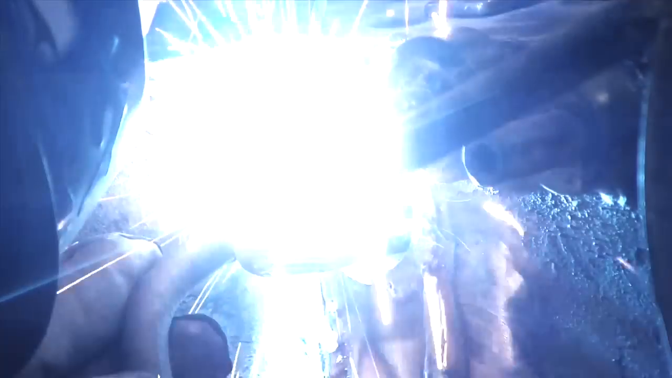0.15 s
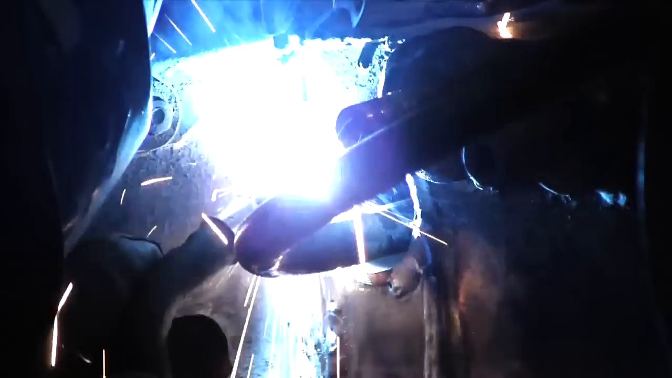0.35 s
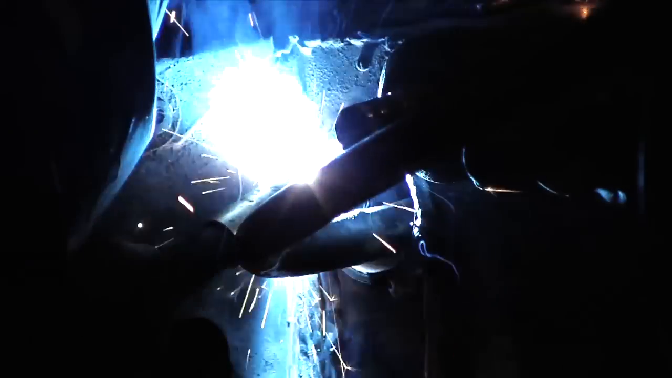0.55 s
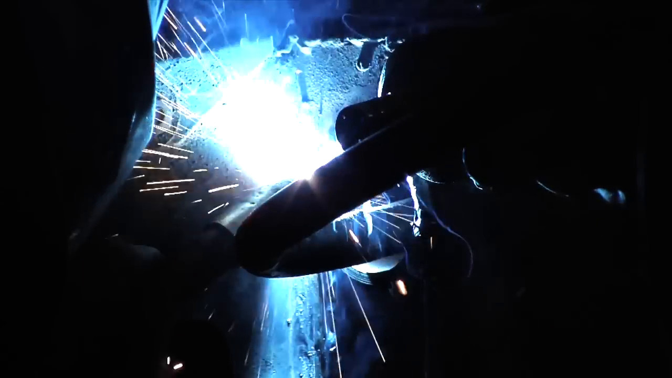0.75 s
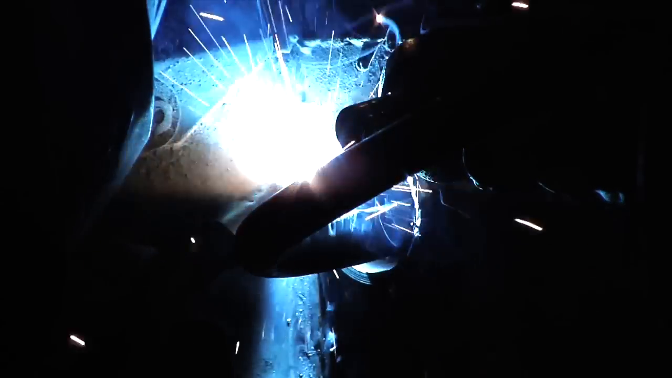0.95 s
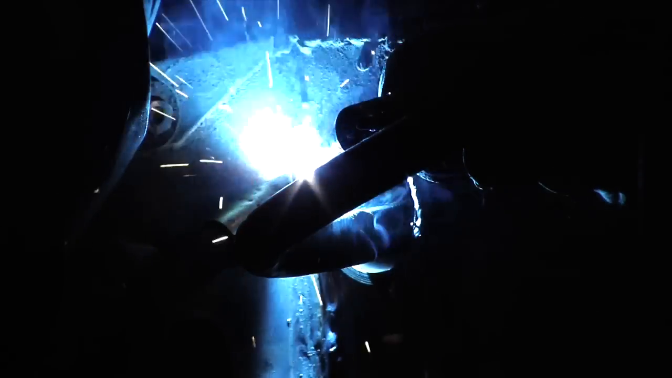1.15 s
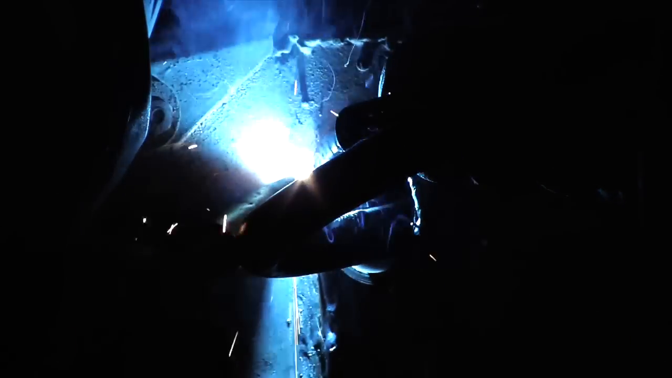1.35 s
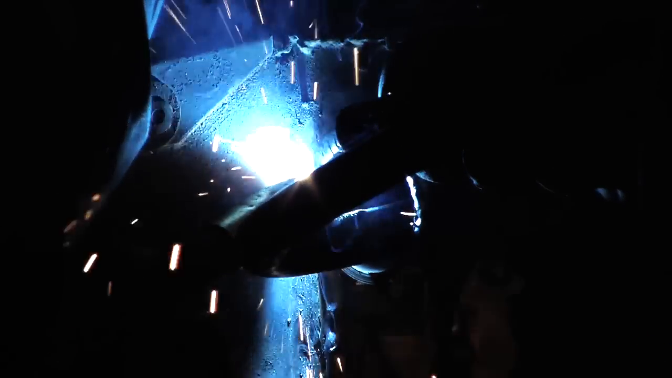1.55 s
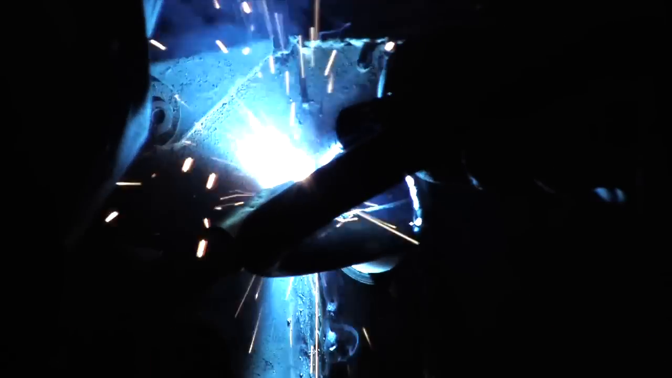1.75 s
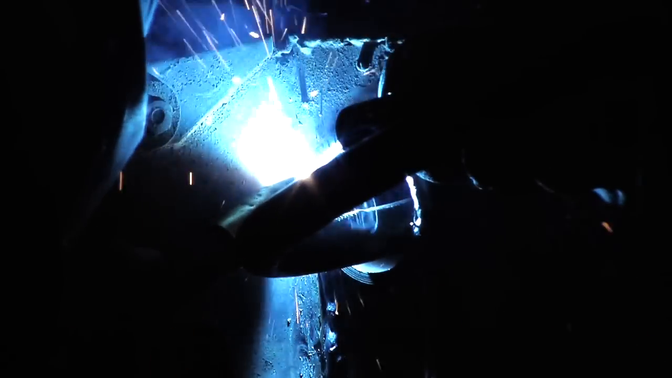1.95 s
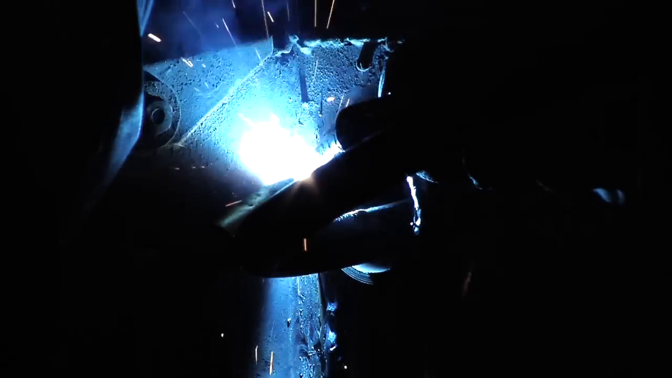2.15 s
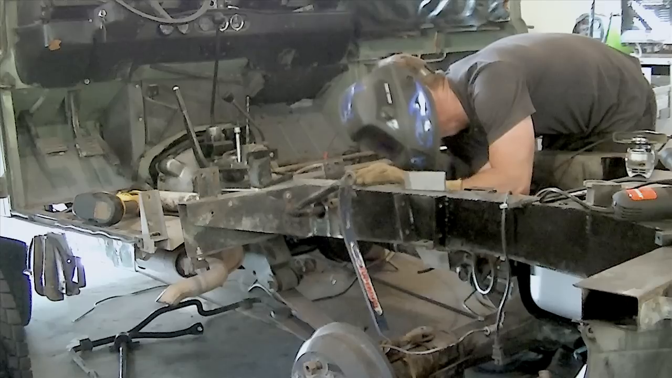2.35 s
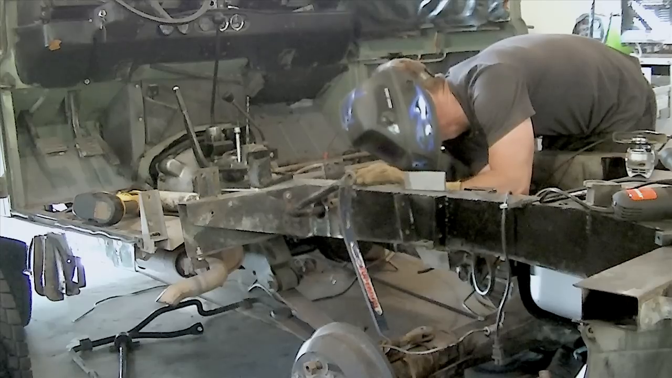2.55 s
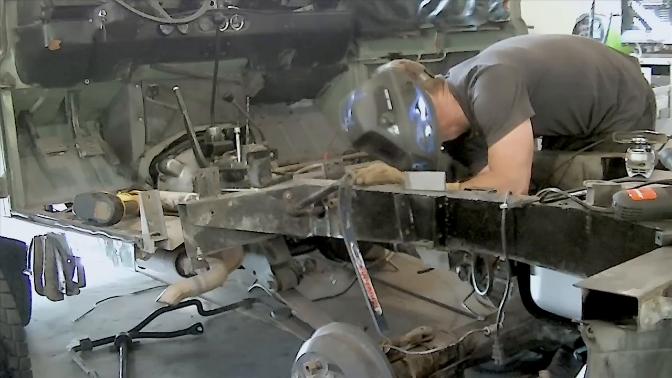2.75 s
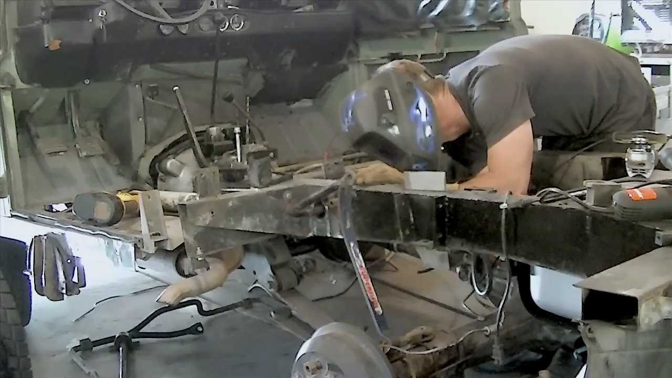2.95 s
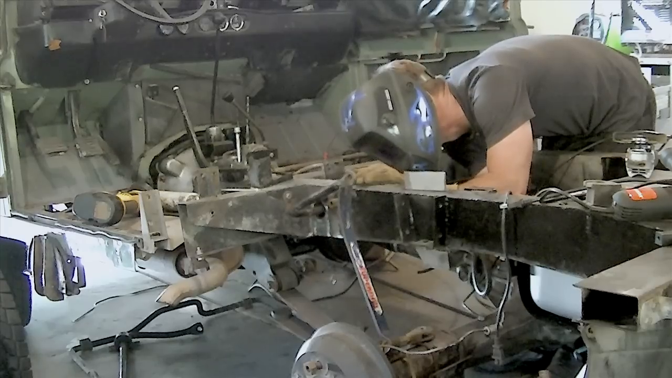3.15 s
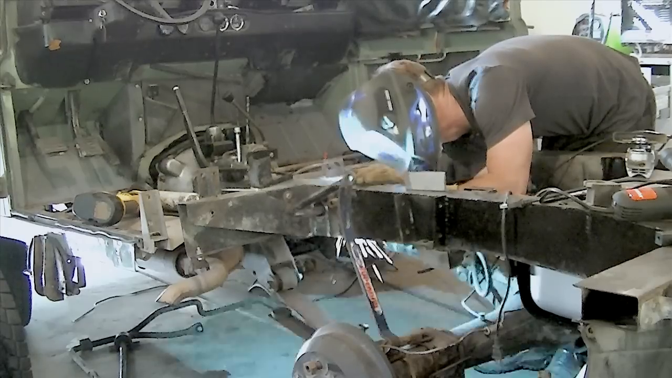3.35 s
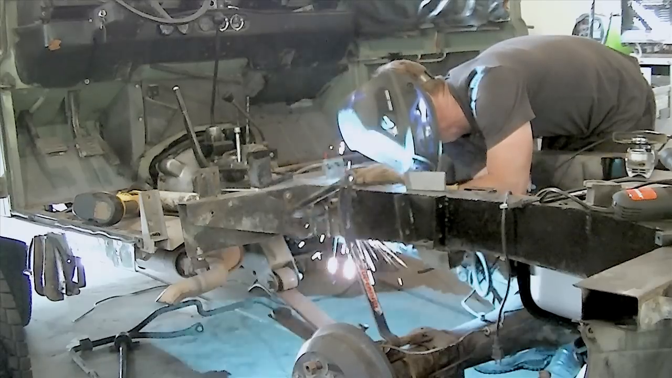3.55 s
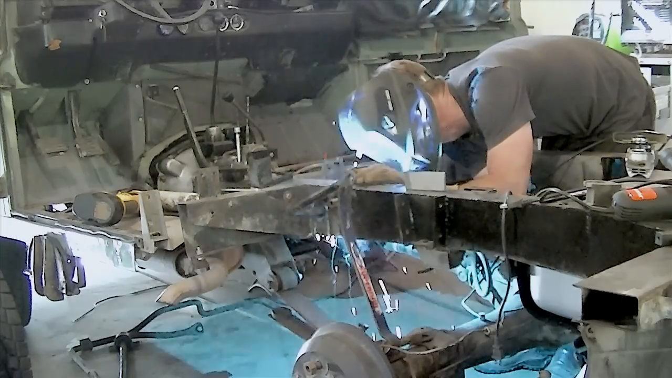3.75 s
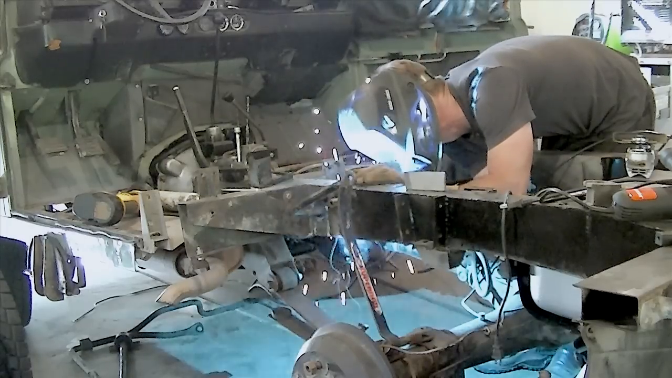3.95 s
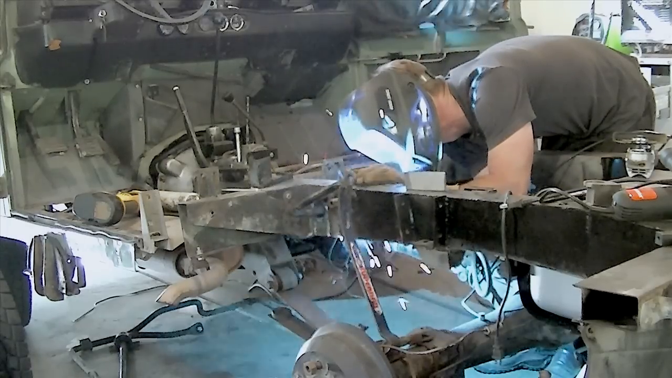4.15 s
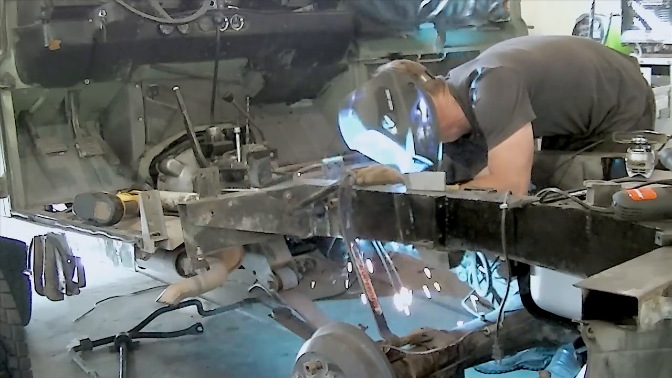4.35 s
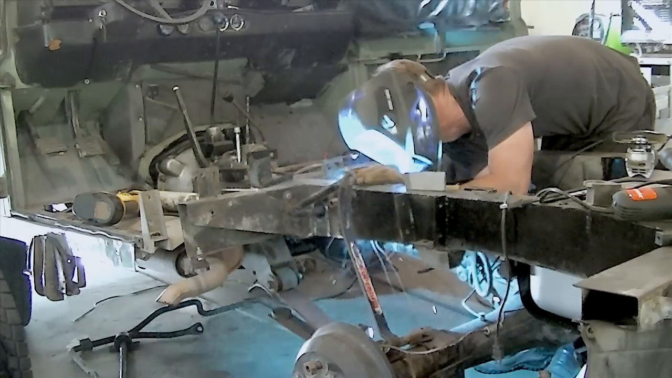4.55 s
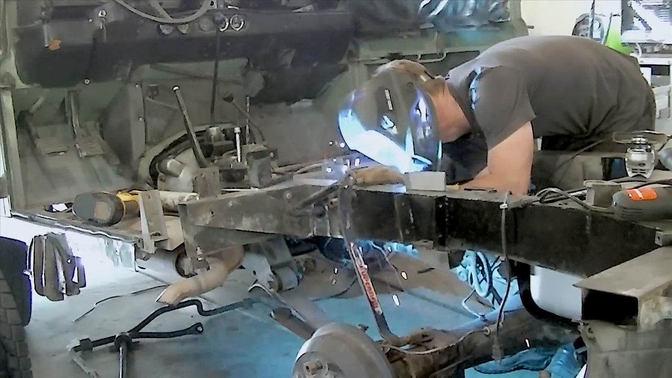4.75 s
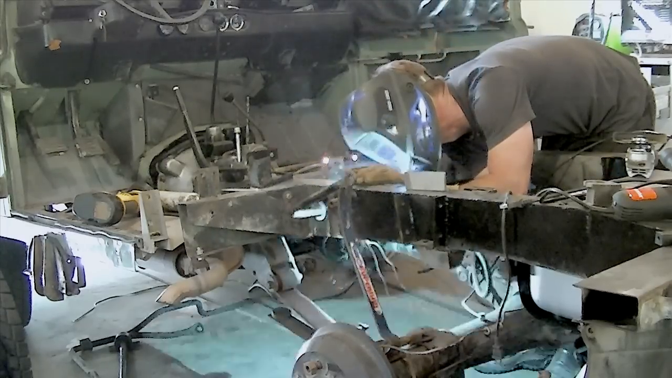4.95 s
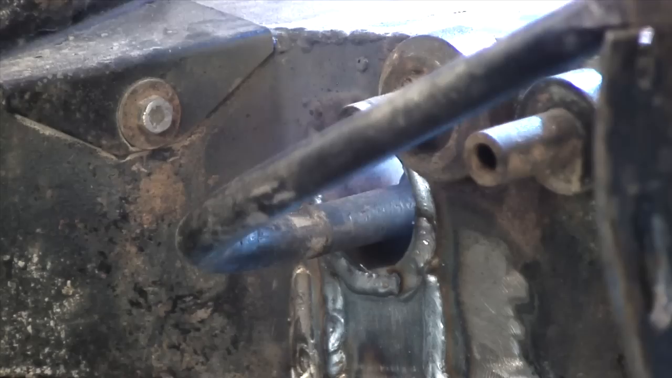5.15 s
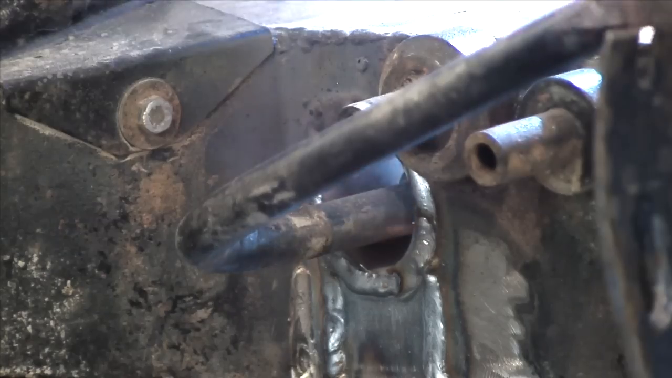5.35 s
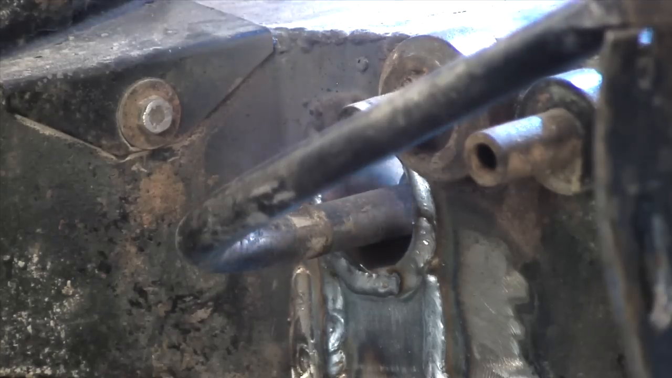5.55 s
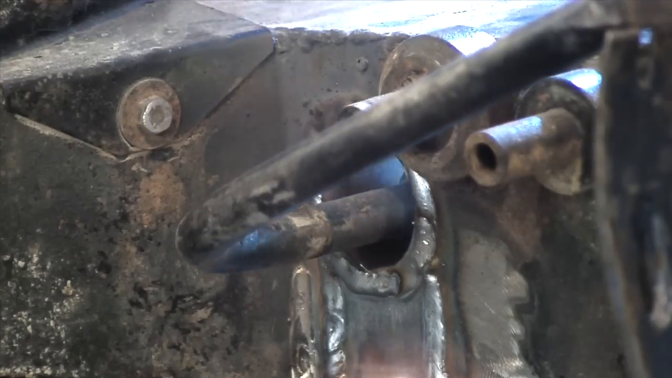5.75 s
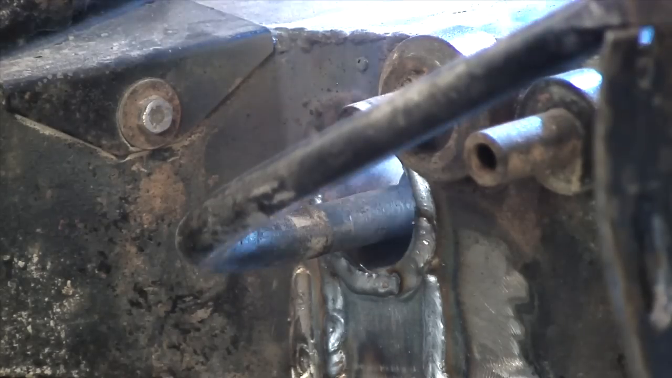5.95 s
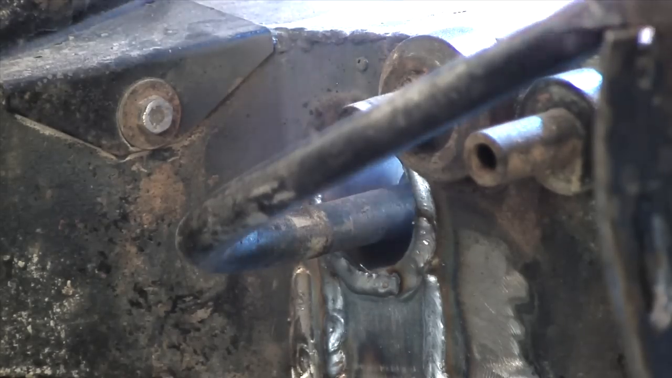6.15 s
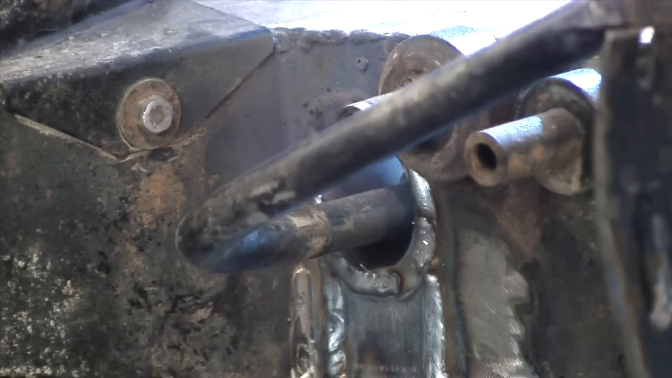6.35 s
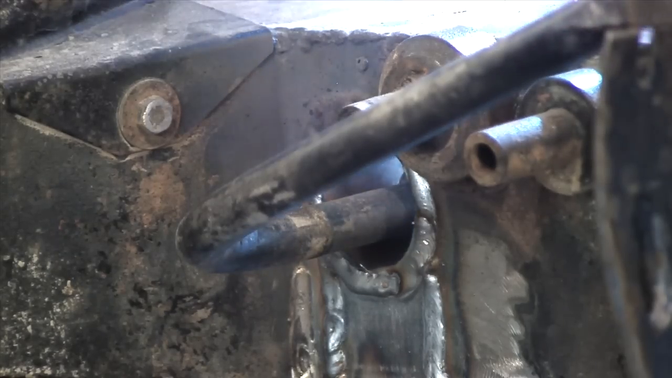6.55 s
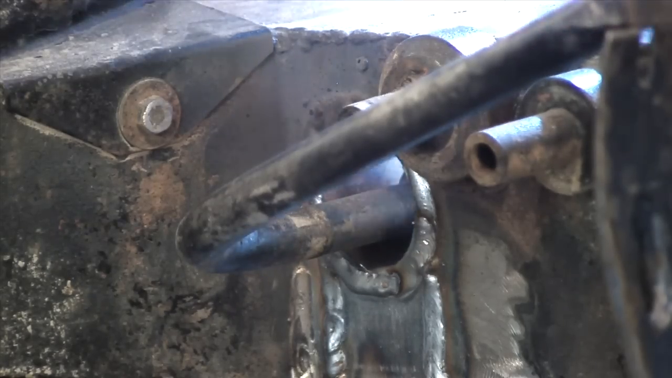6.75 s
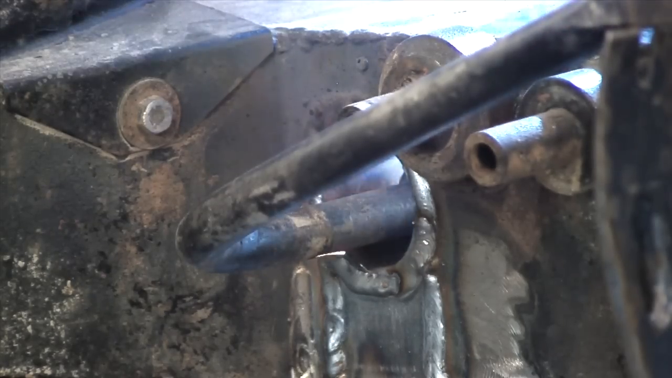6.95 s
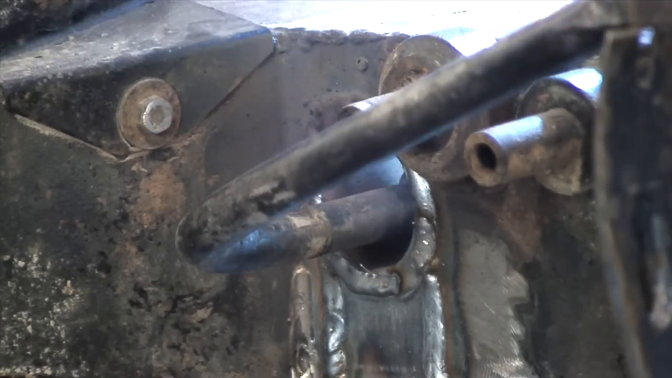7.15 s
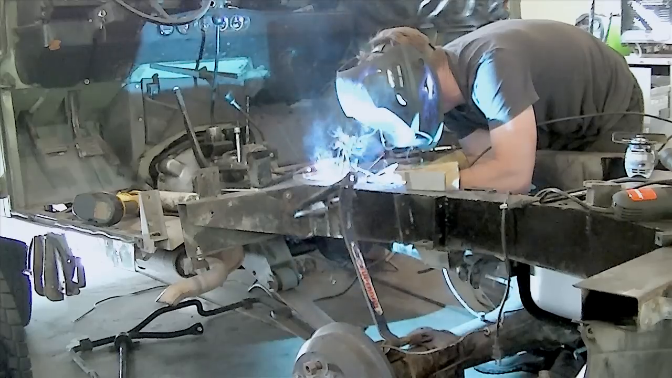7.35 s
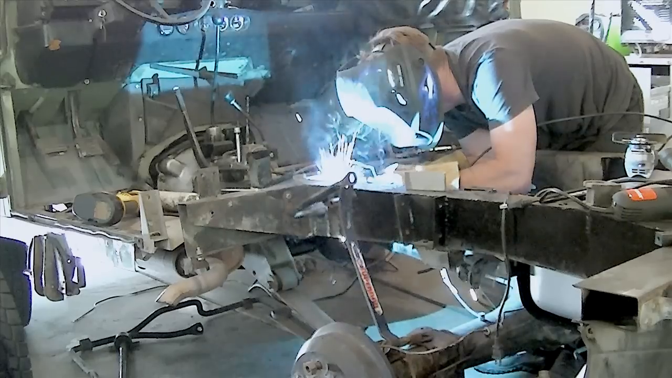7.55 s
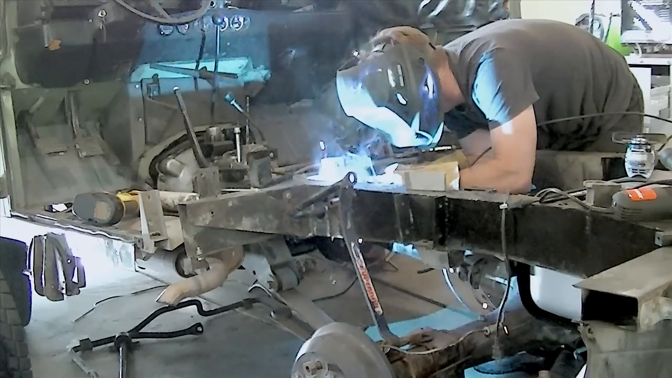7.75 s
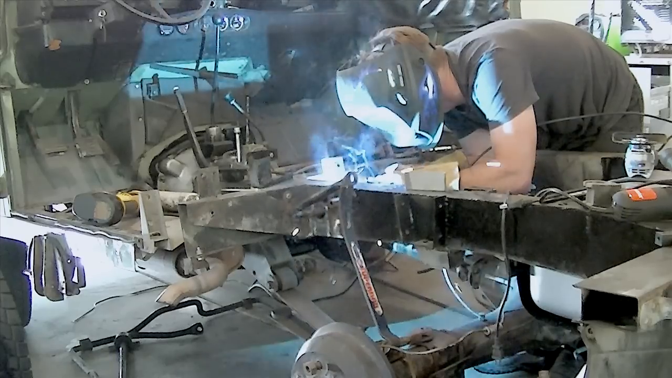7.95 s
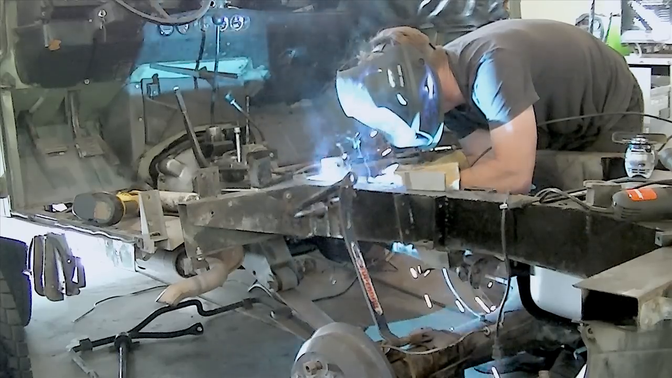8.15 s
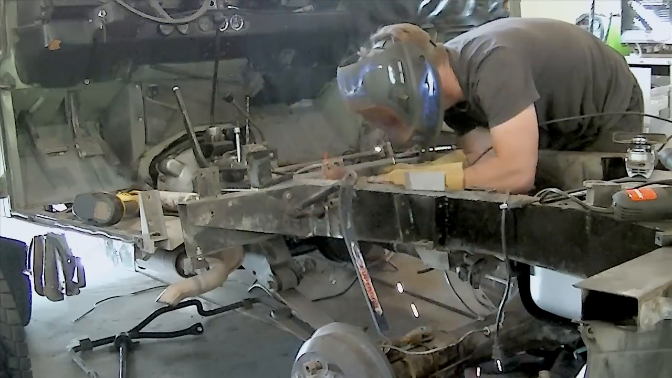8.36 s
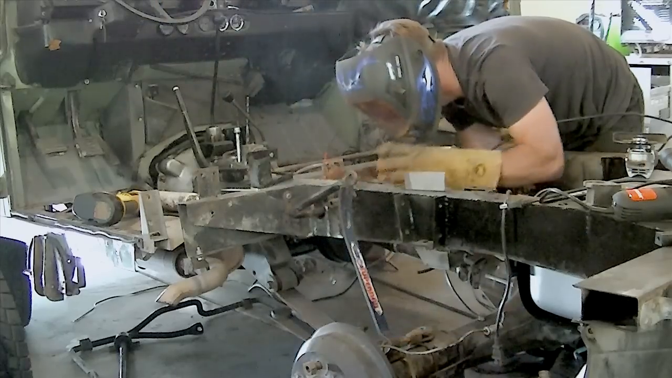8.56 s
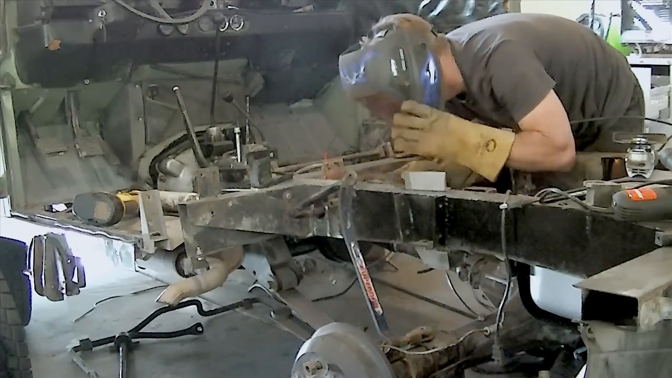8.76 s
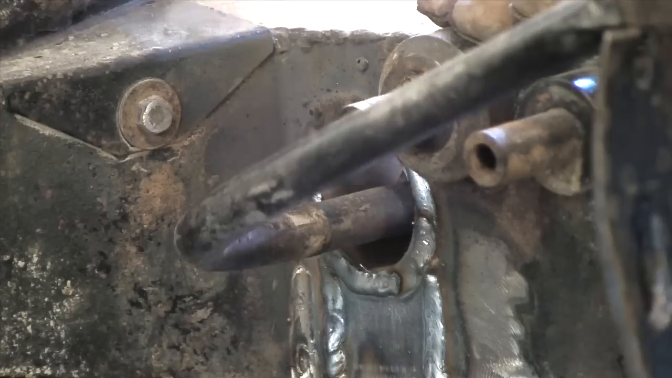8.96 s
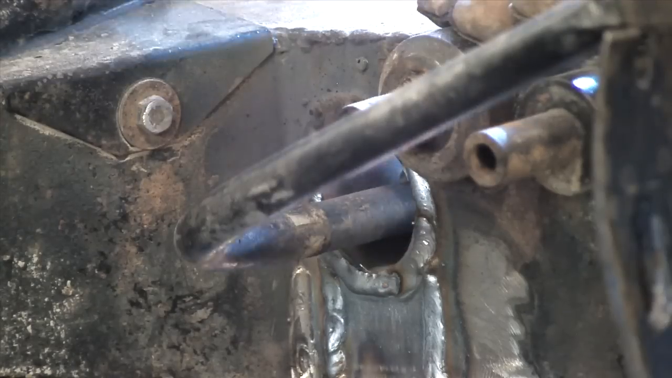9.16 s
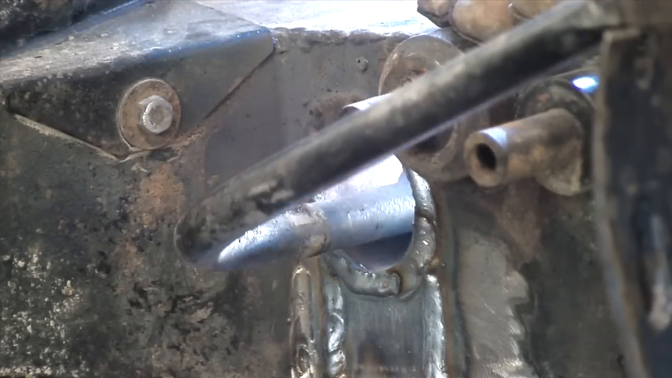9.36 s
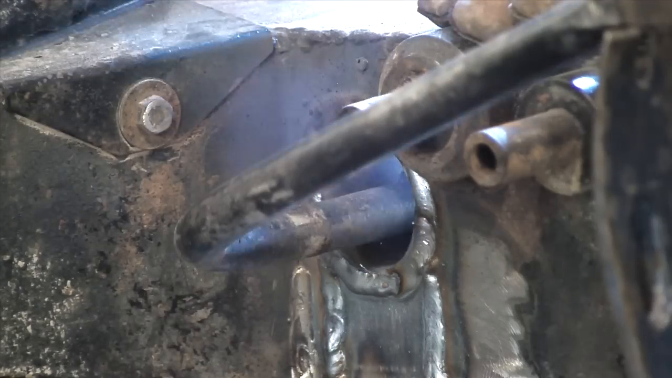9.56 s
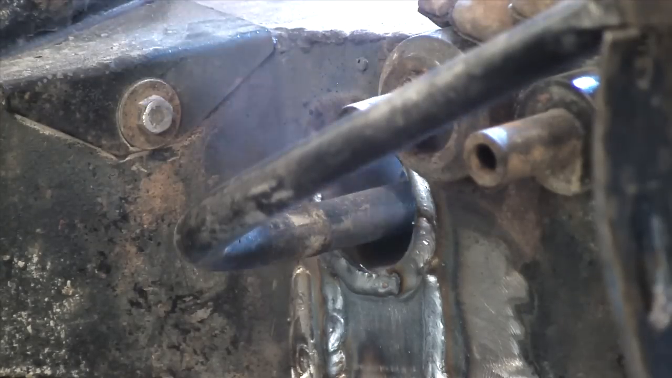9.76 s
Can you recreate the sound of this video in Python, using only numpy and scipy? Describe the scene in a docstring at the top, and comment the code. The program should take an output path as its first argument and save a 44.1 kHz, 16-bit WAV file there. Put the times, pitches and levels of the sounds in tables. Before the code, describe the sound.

Sharp, dense electric welding crackle starts and stops in an echoing workshop, over soft gas hiss and a constant low airy machine fan.

```python
"""Arc cracks in uneven runs, strong and faint: a wire-feed welder lays short beads on a steel frame.
Each crack is a click where the molten bridge bursts; echo taps of frame, floor and roof and decaying noise ring on.
Finer clicks fizz as spatter, filtered noise hisses as gas and wire feed while the trigger is held,
and filtered noise with wavering tones runs throughout as the machine's fan.
One microphone hears five stretches joined end to end."""
import sys
import numpy as np
from scipy import signal
from scipy.fft import rfft, irfft
from scipy.io import wavfile
from scipy.ndimage import uniform_filter1d

SR = 44100
rng = np.random.default_rng(int(sys.argv[2]) if len(sys.argv) > 2 else 0)


def volts_from_db(level):
    """Convert decibel levels to linear amplitude ratios."""
    exponent = np.asarray(level, float) / 20
    return 10 ** exponent


def store_pcm(level_fs):
    """Save levels as 16-bit WAV."""
    pcm = np.round(np.clip(level_fs, -1, 1) * 32767).astype(np.int16)
    wavfile.write(sys.argv[1], SR, np.atleast_2d(pcm).T)


N = 432621


def place(seconds, sizes):
    """Impulses on a silent track: each burst is a pressure step too short to resolve."""
    track = np.zeros(N)
    index = (np.asarray(seconds) * SR).astype(int)
    np.add.at(track, np.clip(index, 0, N - 1), sizes)
    return track


def response(table, size=1024):
    """Causal minimum-phase impulse response through (frequency [Hz], level [dB]) points."""
    hz, db = np.transpose(table)
    log_hz = np.log(np.fft.rfftfreq(size, 1 / SR) + 1)
    log_gain = np.interp(log_hz, np.log(hz), db) * np.log(10) / 20
    cepstrum = irfft(log_gain)
    # fold the cepstrum onto positive time
    cepstrum[1:size // 2] *= 2
    cepstrum[size // 2 + 1:] = 0
    return irfft(np.exp(rfft(cepstrum)))


def level(x, db):
    """Scale to an rms level [dB]."""
    return x * volts_from_db(db) / np.sqrt(np.mean(x ** 2))


def noise(table, db):
    """Steady turbulence: white noise of a given colour and rms level [dB]."""
    white = rng.standard_normal(N + 1024)
    return level(signal.fftconvolve(white, response(table), "valid")[:N], db)


# cracks at set times, strong and faint: (time [s], relative level [dB])
CRACKS = [(0.111, 5.5), (0.126, 9.5), (0.1758, 6.5), (0.1876, 7), (0.2023, 5.5), (0.24, 6.5), (0.2914, 8),
          (0.305, 5.8), (0.3217, 12), (0.3454, 7.5), (0.3537, 4), (0.3685, 8), (0.386, 5.5), (0.423, 9),
          (0.4365, 5), (0.494, 8.5), (0.5208, 11), (0.5504, 9.5), (0.582, 4.5), (0.598, 8.5), (0.6625, 2),
          (0.6782, 3), (0.7555, 1), (0.7748, -1), (0.843, -2), (0.8634, -0.5), (0.889, 1), (0.911, -1),
          (0.9307, -0.5), (0.952, 1), (0.9711, -0.5), (0.993, -3), (1.0178, -2.5), (1.037, -1.5),
          (1.074, 2), (1.1122, 3.5), (1.1309, 7.5), (1.1626, 9), (1.187, 8), (1.2042, 8), (1.2132, 6.5),
          (1.2347, 4.5), (1.2555, 6.5), (1.286, 3.5), (1.3258, 5.5), (1.3686, 6), (1.3876, 5.5),
          (1.4226, 8.5), (1.4534, 4), (1.4869, 2.5), (1.5467, 3), (1.5972, 5.5), (1.611, 7), (1.6658, 1.5),
          (1.7213, 6), (1.753, 2.5), (1.786, 2.5), (1.831, 3), (1.8711, 3.5), (1.8878, 5), (1.92, 0.5),
          (1.9734, 2), (1.991, 3.5), (2.008, 3), (2.055, 8.5), (2.0872, 6), (2.129, 3), (2.1638, 6.5),
          (2.1757, 4), (2.199, 3), (2.2638, 4.5), (2.2896, 5), (3.418, -14), (3.4295, -8), (3.437, -4.5),
          (3.4421, 0), (3.5606, -0.5), (3.5843, -2), (3.6265, 4), (3.6503, 9), (3.68, 5), (3.71, 3),
          (3.7628, -2), (3.841, -1.5), (3.8984, 2.5), (3.947, 0.5), (3.9964, 0.5), (4.0459, 1), (4.0944, 3),
          (4.171, 0), (4.2375, -1.5), (4.3086, -5), (4.3828, -2), (4.432, -9), (4.476, -3), (4.5508, -5),
          (4.5884, 0.5), (4.605, 1), (4.6779, -4), (4.698, 1), (4.7476, -1), (4.795, -5), (4.866, -1),
          (4.888, -8), (5.0428, 10.5), (5.158, -0.5), (5.1853, -2.5), (5.2398, 4), (5.2746, 3),
          (5.2998, 2.5), (5.3772, -0.5), (5.4222, 0), (5.4493, 2.5), (5.4946, 3.5), (5.5737, 2),
          (5.6294, 0.5), (5.7254, -4), (5.7841, 1.5), (5.845, -4), (5.9345, -1), (5.9855, -3),
          (6.0652, 1.5), (6.1106, -1), (6.1507, 0), (6.2143, 1.5), (6.2567, 6), (6.292, 3), (6.328, 2),
          (6.3646, 3.5), (6.4602, 4), (6.4918, 6), (6.5493, 1), (6.635, 2), (6.704, 0), (6.7499, 3),
          (6.842, 0), (6.9733, -1.5), (7.003, 3), (7.0361, 5.5), (7.0567, 1.5), (7.1508, 3), (7.1787, 0.5),
          (7.2072, 1.5), (7.2826, 4), (7.3082, -11), (7.3779, -2.5), (7.4296, 0.2), (7.4568, -1),
          (7.486, 0.5), (7.5138, 1), (7.5745, 3.5), (7.6036, 1), (7.6797, 0), (7.8114, -2.5), (7.8545, -6),
          (7.9246, 1.5), (7.9623, -2.5), (7.9998, -0.5), (8.079, 1.5), (8.0952, 0.5), (8.175, -1.5),
          (8.205, -1), (8.2833, -1.5), (8.2962, -1.5), (9.0548, 4), (9.1427, -4.5), (9.2019, 3),
          (9.216, -5), (9.2952, 4.5), (9.3034, 11), (9.3555, 4.5), (9.3894, 4), (9.4612, 0.5), (9.514, 2),
          (9.5475, 4.5), (9.561, 8), (9.6362, 4), (9.6803, 5.5), (9.7155, 10), (9.7666, 4.5)]
# strikes on cold wire that burst twice: (time [s], gap [ms], second burst re first [dB])
DOUBLES = [(5.0427, .84, -7), (9.0551, .46, -4)]
# state of the arc: (time [s], gap between random cracks [ms], their relative level [dB], treble [dB])
ARC = [(0.15, 10, 2, 0.5), (0.4, 11.2, 1, 3), (0.6, 22.3, 0.5, 4.5), (0.71, 19.9, -1, 2.5),
       (0.85, 20.6, -4.5, -13), (1.05, 21.7, -0.5, -4), (1.2, 10, -0.5, -0.5), (1.45, 11.9, -1, 2),
       (1.7, 11, -3.5, 1.8), (2.0, 10.04, -1, -0.5), (2.3, 11.4, 1, 0), (3.5, 17, -5, 2),
       (4.05, 11.15, -3.5, -3.5), (4.3, 16, -6.5, -1), (4.5, 16, -10, 3), (4.7, 13.3, -2.5, 2),
       (4.9, 11.8, -10, 2.5), (5.2, 9.9, -11, 0.5), (5.26, 16, -0.5, -4), (5.6, 15.9, -3.5, -0.5),
       (5.85, 18.3, -8.5, 3), (6.12, 16.2, -6, -5), (6.4, 18, -4.5, 1.5), (6.75, 12.6, -6, 0),
       (7.0, 13, -4.5, -0.5), (7.28, 13, -2.5, 0.5), (7.33, 13.9, -8, -1), (7.599, 11.1, -4, -7),
       (7.76, 14.2, -13.5, 1), (8.05, 11.4, -5.5, 1.5), (8.3, 13.4, -7, -4.5), (9.1, 13, -6, 3.5),
       (9.4, 13, -1, -0.5), (9.8, 14, 1.5, 0)]
SPATTER_PER_S, SPATTER_DB, SPATTER_SPREAD_DB = 300, -25, 2.5  # level re decaying crack strength
SHARP_HZ = 7330


def arc():
    """Bridge bursts crack and throw fine, much fainter spatter that rises and falls with the recent cracks."""
    set_s, set_db = np.transpose(CRACKS)
    set_s = set_s + .0001 * (rng.random(len(set_s)) - .5)  # no crack on a round time
    random_s, random_db, heard = random_cracks()
    random_size = heard * volts_from_db(random_db)
    cracks = place(set_s, volts_from_db(set_db)) + place(random_s, random_size)
    for at_s, gap_ms, second_db in DOUBLES:
        k = np.argmin(np.abs(set_s - at_s))
        cracks += place([set_s[k] + gap_ms / 1000], volts_from_db(set_db[k] + second_db))

    # a weaker burst 0.1-0.6 ms after each crack varies its colour
    crack_s = np.append(set_s, random_s)
    size = np.append(volts_from_db(set_db), random_size)
    lag, weight = rng.random((N // 100, 2))[:len(crack_s)].T
    cracks += place(crack_s + .0001 + .0005 * lag, size * .35 * weight)

    fade = np.exp(-1 / (0.026 * SR))  # 26 ms time constant
    strength = signal.lfilter([1], [1, -fade], cracks)
    when, rarity = rng.random((int(SPATTER_PER_S * N / SR), 2)).T
    spatter_db = SPATTER_DB - SPATTER_SPREAD_DB * np.log(rarity + 0.0023)
    clicks = cracks + strength * place(when * N / SR, volts_from_db(spatter_db))

    # a sharper arc has more treble
    soft = signal.filtfilt(*signal.butter(2, SHARP_HZ, fs=SR), clicks)
    at_s, _, _, treble_db = np.transpose(ARC)
    sharp_db = np.interp(np.arange(N) / SR, at_s, treble_db)
    return soft + volts_from_db(sharp_db) * (clicks - soft)


# spans filled with random cracks; outside them only the set cracks sound: (from [s], to [s])
CRACKLE = [(.176, 1.05), (1.115, 1.54), (1.61, 2.35), (3.56, 4.4), (4.36, 4.57), (4.66, 4.93), (5.13, 5.73),
           (5.79, 5.85), (5.98, 8.1), (8.17, 8.31), (9.2, 9.31), (9.35, 9.63)]
GAP_SPREAD, STRENGTH_SPREAD_DB, STRONGEST = .25, 3.5, 1.15  # [gaps], [dB], ceiling [spreads]
REFILL_MS = 7  # the bridge forms anew: no random crack this close to a set one


def random_cracks():
    """The bridge forms and bursts at an uneven pace, filling the time between set cracks."""
    t = np.arange(0, N / SR, .001)
    at_s, gap_ms, db, _ = np.transpose(ARC)
    cycles = np.cumsum(1 / np.interp(t, at_s, gap_ms))  # 1 ms steps
    count = int(cycles[-1])
    gap_chance, size_chance = rng.standard_normal((N // 200, 2))[:count].T
    s = np.interp(np.arange(count) + GAP_SPREAD * gap_chance, cycles, t)
    burning = sum((s > on) & (s < off) for on, off in CRACKLE) > 0
    nearest_s = np.abs(s[:, None] - np.transpose(CRACKS)[0]).min(axis=1)
    clear = nearest_s > REFILL_MS / 1000
    size_db = np.interp(s, at_s, db) + STRENGTH_SPREAD_DB * np.minimum(size_chance, STRONGEST)
    return s, size_db, burning & clear


LATER_DB = 2.5  # arrivals from 2 ms on


def workshop(echoes, share, roof_db, screen, colour):
    """Crack to microphone: screened first arrivals, later echoes, scatter from two torch places."""
    early = SR // 25  # 40 ms
    corner_hz, q, first_db, build_ms = screen
    first, later = np.zeros((2, SR))
    for ms, gain in echoes:
        arrivals = first if ms < 2 else later
        arrivals[int(ms * SR / 1000)] += gain
    corner = 2 * np.pi * corner_hz
    lowpass = signal.bilinear([1], [1 / corner ** 2, 1 / (corner * q), 1], SR)
    screened = signal.lfilter(*lowpass, first)
    clear = volts_from_db(LATER_DB) * later + volts_from_db(first_db) * screened

    tails = [scattered(roof_db, build_ms) for _ in range(2)]
    tails = [h * np.sqrt(np.clip(share, 0, 1) / np.sum(h[:early] ** 2)) for h in tails]
    paths = np.array([clear, *tails])
    paths = signal.fftconvolve(paths, response(colour)[None])[:, :SR]
    # unit early energy: clear arrivals plus the first tail
    return paths / np.sqrt(np.sum(paths[:2, :early] ** 2))


# hall decay: (frequency [Hz], t60 [s])
HALL = [(300, 0.69), (800, 0.9), (1600, 0.72), (3200, 0.85), (6400, 0.64), (9500, 0.52), (14000, 0.35)]
ROOF_MS, ROOF_WIDTH_MS = 19.4, 1.3
DENSE_MS, SPARSEST = 45, .18  # SPARSEST: chance of a reflection per sample at 0 ms


def scattered(roof_db, build_ms):
    """Reflections crowd together, each band dies at its own rate, the roof's answer swells."""
    t = np.arange(SR) / SR
    density = np.clip(SPARSEST + (1000 * t / DENSE_MS) ** 2, 0, 1)
    arrivals = rng.standard_normal(SR) * (rng.random(SR) < density) / np.sqrt(density)
    spectrum = rfft(arrivals)
    octave = np.log2(np.arange(SR // 2 + 1) + 1.)
    centres = np.log2([hz for hz, _ in HALL])
    tail = 0
    for row, (_, t60_s) in zip(np.eye(len(HALL)), HALL):
        band = irfft(spectrum * np.interp(octave, centres, row))
        tail = tail + band * 1000 ** (-t / t60_s)
    roof = roof_db * np.exp(-.5 * ((1000 * t - ROOF_MS) / ROOF_WIDTH_MS) ** 2)
    return tail * volts_from_db(roof) * np.clip(1000 * t / build_ms, 0, 1)


# trigger held: (on [s], off [s], rms level [dB])
TRIGGER = [(.03, 2.3, -41.5), (3.415, 8.36, -43.5), (8.964, 9.82, -40.5)]
# gas colour: (frequency [Hz], relative level [dB])
GAS = [(120, -48), (200, -27.5), (462, -11.5), (769, -8), (1190, -0.5), (1510, -2.5), (2380, -5),
       (2900, -11), (7480, -19), (15500, -32)]


def feed():
    """Gas and wire feed: turbulent hiss that opens and closes with the trigger."""
    t = np.arange(N) / SR
    held = 0
    for on, off, db in TRIGGER:
        held = held + volts_from_db(db) * np.clip(np.minimum(t - on, off - t) / 0.017, 0, 1)  # 17 ms ramps
    return held * noise(GAS, 0)


# fan air colour: (frequency [Hz], relative level [dB])
FAN = [(59, -51.5), (105, -49), (160, -28.5), (196, -12), (281, -22.5), (370, -21), (552, -10), (712, -10),
       (898, -2.5), (977, -7.5), (1210, -6.5), (1340, -6.5), (1660, -9.5), (2090, -14.5), (15500, -46.5)]
# fan tones: (frequency [Hz], rms level [dB])
FAN_TONES = [(120, -89), (200, -81), (279, -77), (560, -71), (651, -68), (771, -68), (921, -61),
             (1041, -66), (1205, -66), (1647, -67), (1776, -72)]


def fan():
    """Rushing air at 0 dB rms, and narrow tones whose slow random quadratures waver in level."""
    t = np.arange(N) / SR
    waver = [uniform_filter1d(rng.standard_normal((2, N)), SR // 5) for _ in FAN_TONES]
    tones = 0
    for (hz, db), (a, b) in zip(FAN_TONES, waver):
        phase = 2 * np.pi * hz * t
        tones = tones + level((a + 0.03) * np.cos(phase) + b * np.sin(phase), db)
    return noise(FAN, 0), tones


# stretches: (early scatter energy before scaling [0-1], roof echo swell [dB], fan air rms level [dB])
STRETCHES = [(1, -0.5, -47), (0.82, 5, -48.5), (0.62, 0, -50.5), (0.91, 1.5, -48), (1, 4.5, -46.5)]
# stretch bounds: (time [s])
JOINS_S = [0, 2.3295, 5.232, 7.301, 8.96, 9.82]
# clear arrivals of a crack, one table a stretch: (delay [ms], relative signed gain)
ECHOES = [
    [(0.32, 0.34), (0.91, 0.027), (1.56, 0.036), (4.78, 0.019), (6.08, -0.13), (8.16, 0.29), (9.93, -0.013),
     (13.22, 0.018), (22.59, -0.24)],
    [(0.41, -0.28), (0.86, -0.3), (1.18, 0.038), (14.13, -0.12), (15.92, 0.15), (16.33, 0.0098),
     (17.73, 0.077), (21.0, -0.2), (25.85, -0.15)],
    [(0.63, -0.13), (1.09, 0.045), (13.15, 0.15), (14.2, -0.089), (16.12, -0.2), (16.58, -0.064),
     (17.03, 0.061), (17.64, -0.16), (24.88, -0.058)],
    [(0.39, 0.13), (1.09, -0.16), (1.77, -0.105), (13.22, -0.15), (14.13, 0.15), (16.15, -0.13),
     (16.58, 0.11), (17.66, -0.12), (24.88, -0.029)],
    [(0.77, 0.21), (1.18, 0.03), (3.83, -0.015), (13.33, 0.044), (15.15, 0.062), (16.1, -0.16),
     (16.83, 0.005), (17.62, -0.18), (24.01, 0.12)],
]
# nozzle and frame screen the first arrivals, one row a stretch:
# (corner [Hz], ring Q, gain [dB], scatter build-up [ms])
SCREEN = [(7200, 1.2, 6, 4), (3500, 1.1, 3.5, 2.5), (8000, 1.1, 2.5, 2.5), (8000, 1.1, 2.5, 2.5),
          (8000, 1.1, 3.5, 2.5)]
# crack colour, one table a torch position: (frequency [Hz], relative level [dB])
NEAR = [(240, -48), (400, -23), (663, -18), (715, -12.5), (784, -13), (873, -8.5), (1320, 0.5), (1560, -1),
        (1930, -8.5), (3160, -4), (3970, -7.5), (7210, -4.5), (8150, -10.5), (11900, -11), (15500, -26)]
BEHIND = [(150, -59), (260, -29.5), (406, -25), (633, -17), (726, -15.5), (846, -6.5), (1190, -3.5),
          (1460, 0), (2360, -6.5), (3000, -4), (4680, -5), (6590, -2.5), (7950, -6.5), (9600, -3),
          (15500, -18)]
INSIDE = [(150, -53), (260, -28.5), (330, -24.5), (360, -24.5), (678, -15.5), (922, -6), (1510, 0),
          (2210, -6), (3320, -4), (5370, -5), (7060, -3), (8370, -7), (9770, -2), (14700, -15),
          (15500, -14)]
TRAVEL_RAD_PER_S = 1.2


def scene():
    """Each stretch has its own echoes and screening; a join cuts the ringing hall off."""
    t = np.arange(N) / SR
    source = arc()
    air, tones = fan()
    out = feed() + tones
    colours = (NEAR, BEHIND, INSIDE, INSIDE, INSIDE)
    # torch travel slides the scatter from one pattern to another
    angle = TRAVEL_RAD_PER_S * t
    weights = np.array([np.ones(N), np.cos(angle), np.sin(angle)])
    for k, (share, roof_db, fan_db) in enumerate(STRETCHES):
        start, end = JOINS_S[k:k + 2]
        strike = min(s for s, _ in CRACKS if s > start)
        clicks = source * (t >= strike - .001) * (t < end)
        # stretches opening in mid-bead already ring: their first 250 ms of clicks, played ahead
        mid_bead = k in (2, 3)
        before = np.roll(clicks, -SR // 4) * (t < start) * mid_bead * volts_from_db(-2.0)
        paths = workshop(ECHOES[k], share, roof_db, SCREEN[k], colours[k])
        heard = signal.fftconvolve(weights * (clicks + before), paths, axes=1)[:, :N].sum(axis=0)
        join_s = .00002 if k == 0 else .001
        here = np.clip(np.minimum(t - start + .001, end - t) / join_s, 0, 1)
        out = out + here * (heard + volts_from_db(fan_db) * air)
    return np.array([out, out])


def low_pass(x):
    """Removes everything above the highest recorded frequency."""
    return signal.sosfilt(signal.butter(12, 16490, fs=SR, output="sos"), x)


TOP_HZ = 15450


def record(dry):
    """One microphone on both channels: steep lowpass, then peaks limited hard at full scale."""
    lowpass = signal.ellip(10, .2, 45, TOP_HZ, fs=SR, output="sos")
    cut = signal.sosfilt(lowpass, dry)
    return low_pass(np.clip(cut, -1, 1))


dry = scene()
out = record(dry)
store_pcm(out)
```